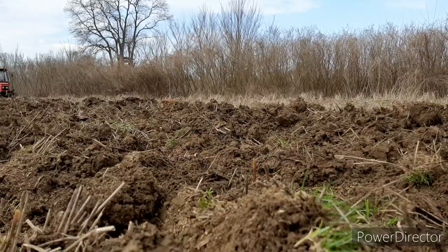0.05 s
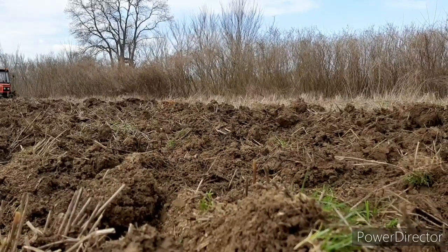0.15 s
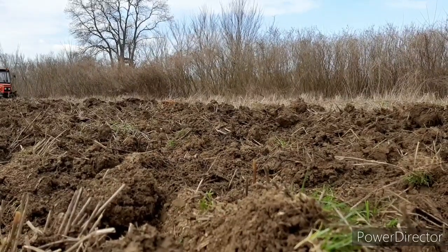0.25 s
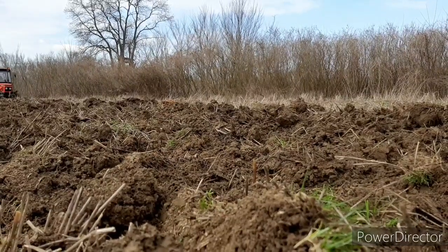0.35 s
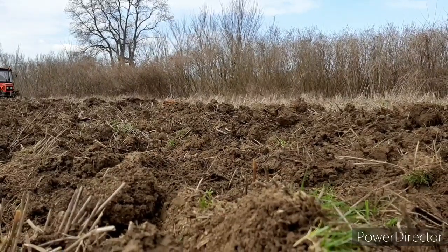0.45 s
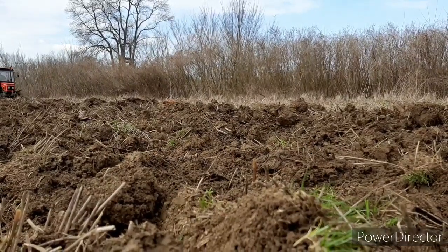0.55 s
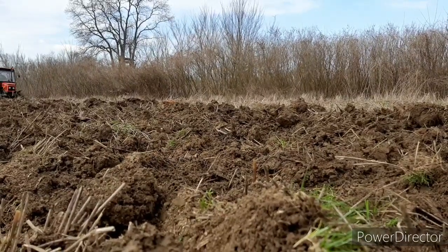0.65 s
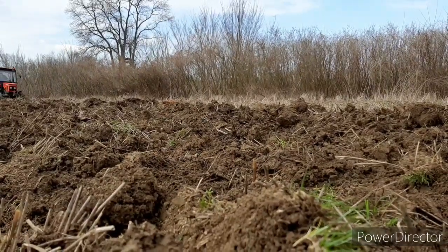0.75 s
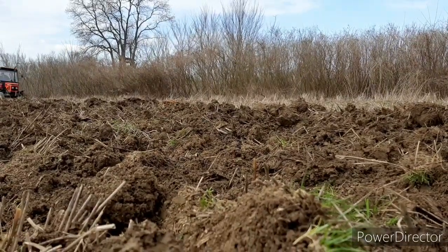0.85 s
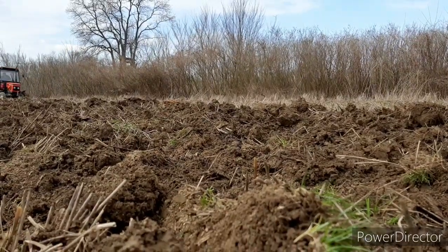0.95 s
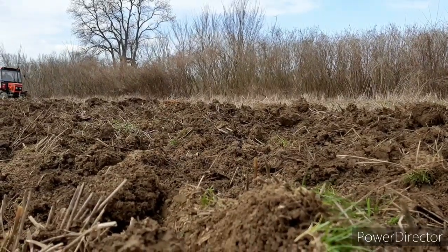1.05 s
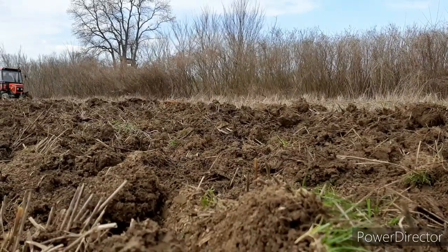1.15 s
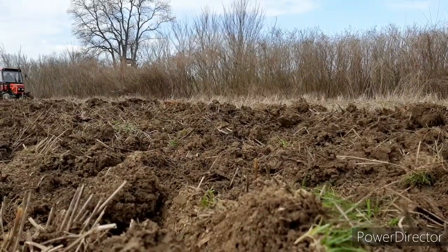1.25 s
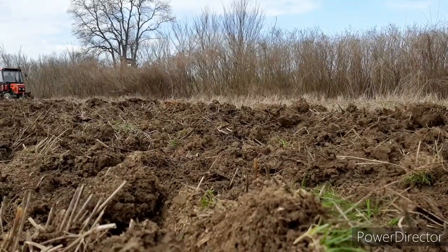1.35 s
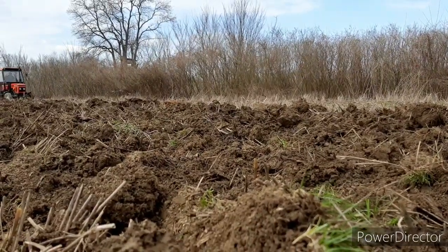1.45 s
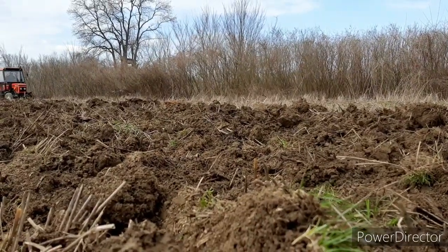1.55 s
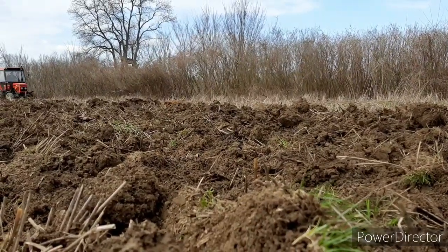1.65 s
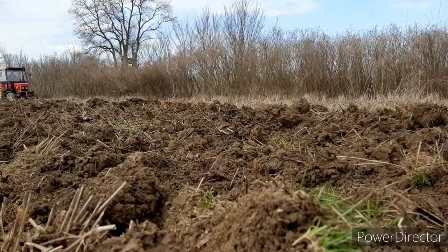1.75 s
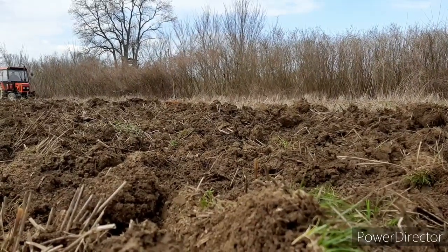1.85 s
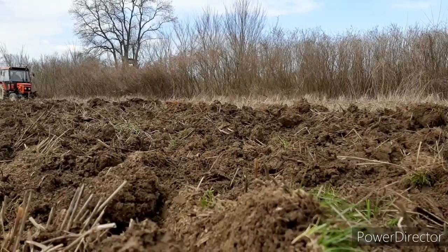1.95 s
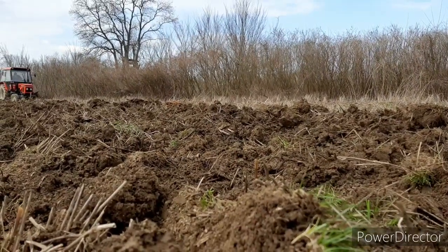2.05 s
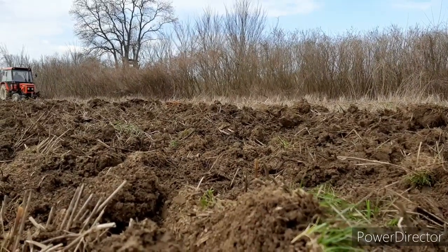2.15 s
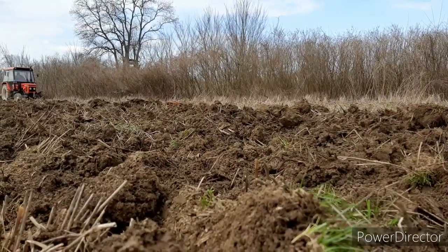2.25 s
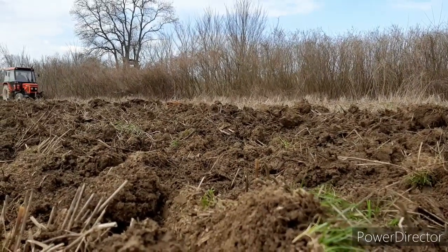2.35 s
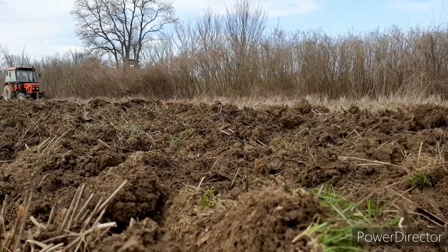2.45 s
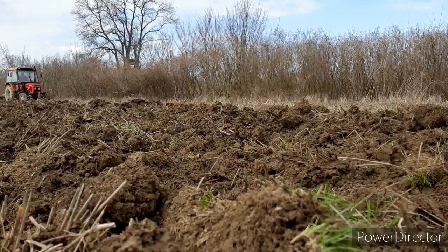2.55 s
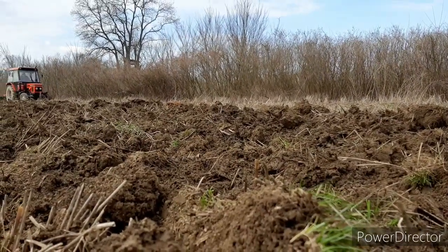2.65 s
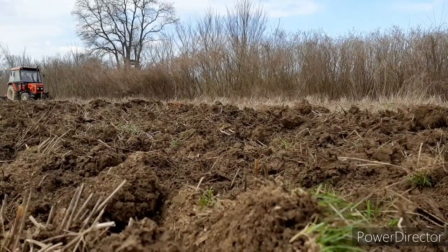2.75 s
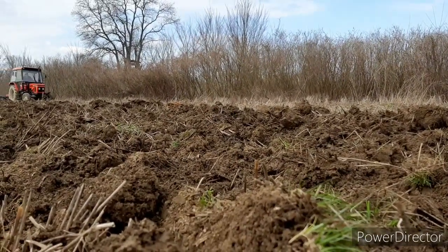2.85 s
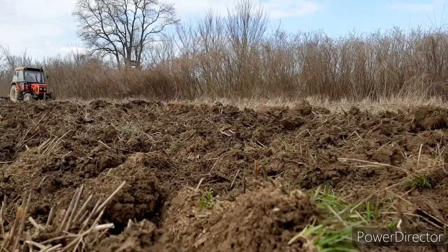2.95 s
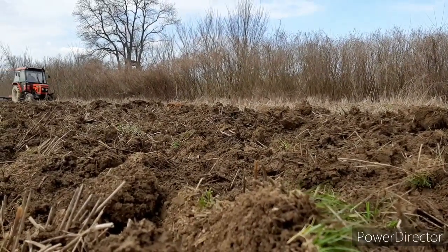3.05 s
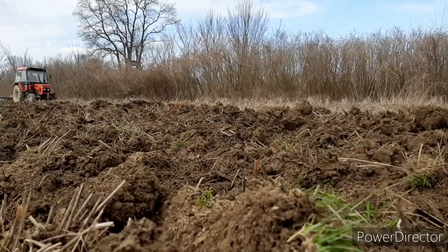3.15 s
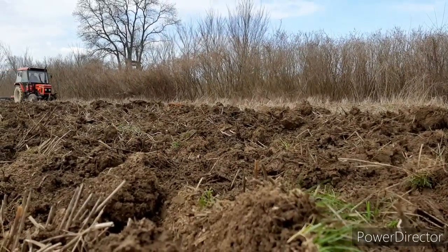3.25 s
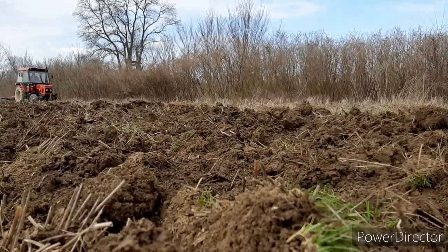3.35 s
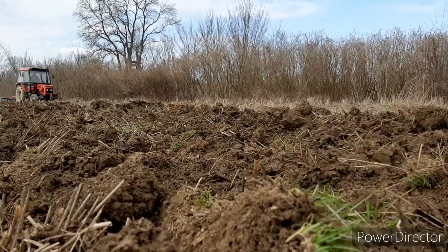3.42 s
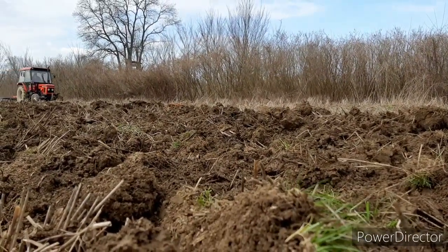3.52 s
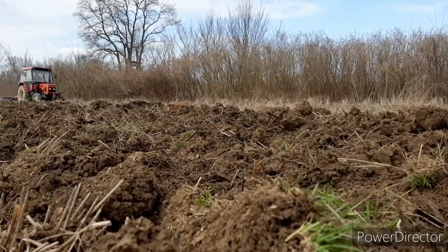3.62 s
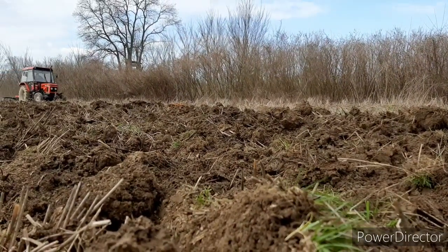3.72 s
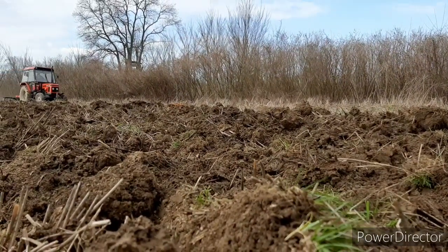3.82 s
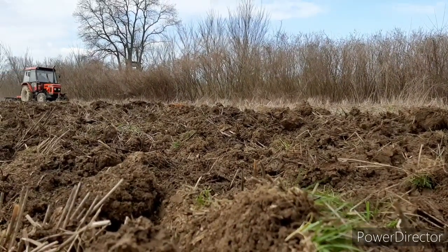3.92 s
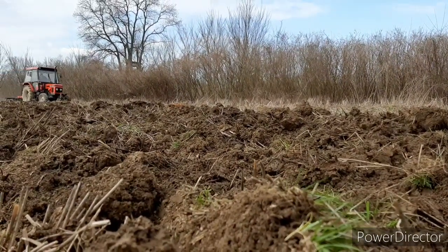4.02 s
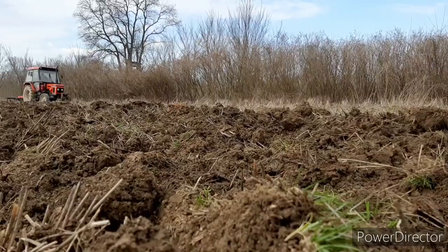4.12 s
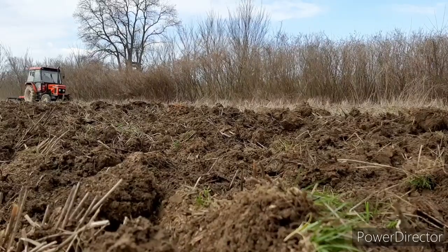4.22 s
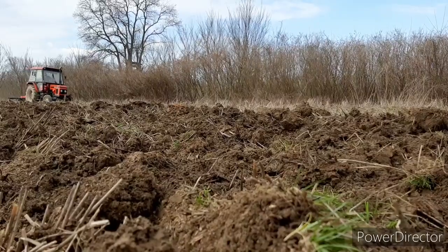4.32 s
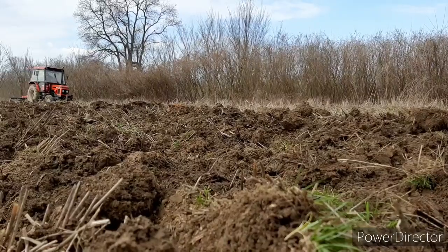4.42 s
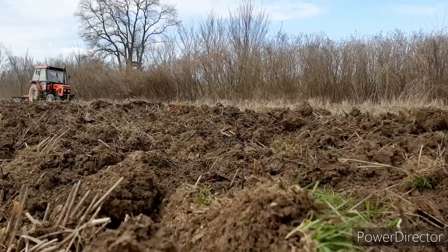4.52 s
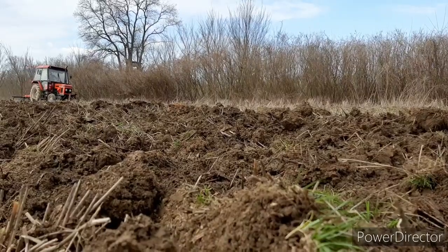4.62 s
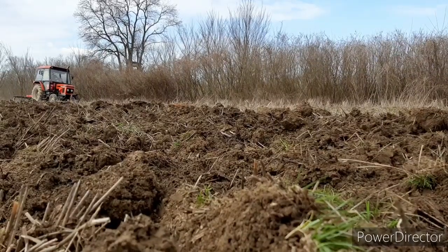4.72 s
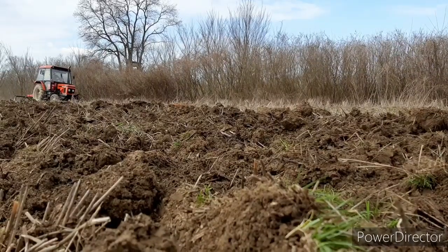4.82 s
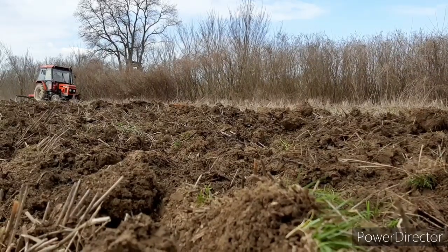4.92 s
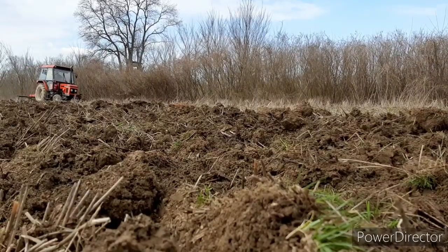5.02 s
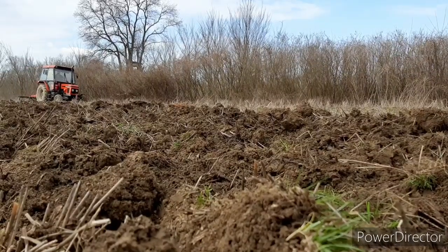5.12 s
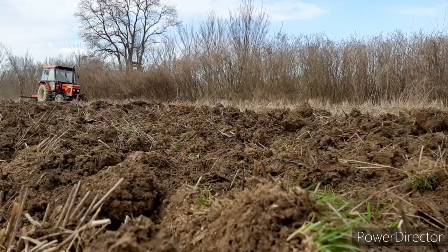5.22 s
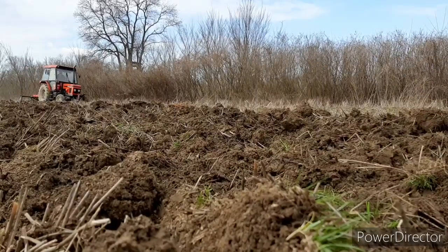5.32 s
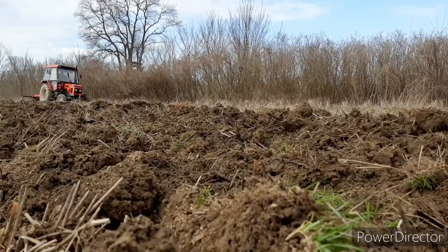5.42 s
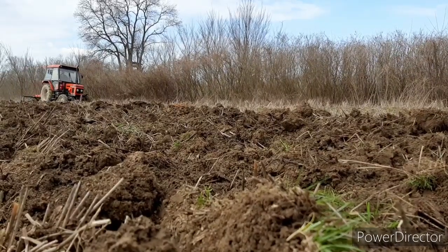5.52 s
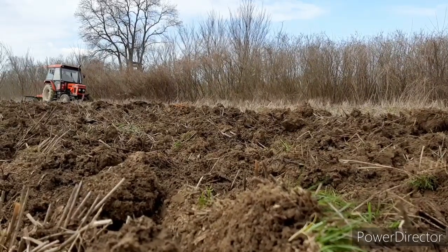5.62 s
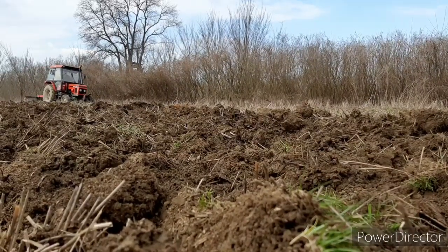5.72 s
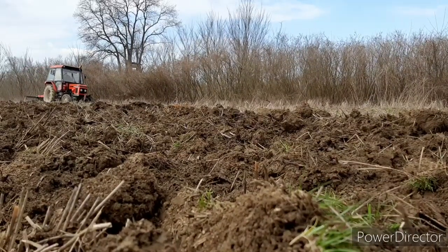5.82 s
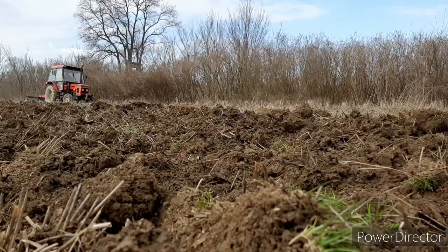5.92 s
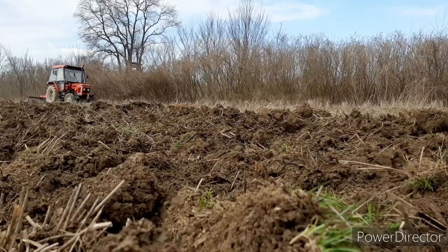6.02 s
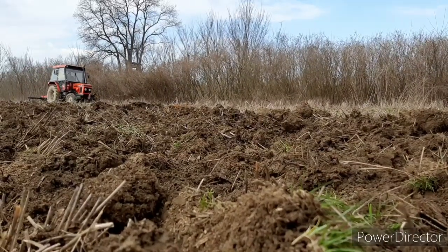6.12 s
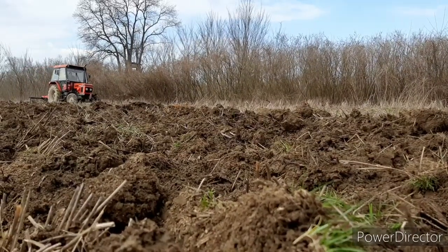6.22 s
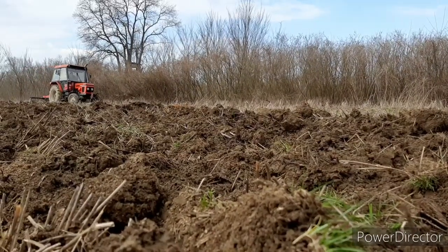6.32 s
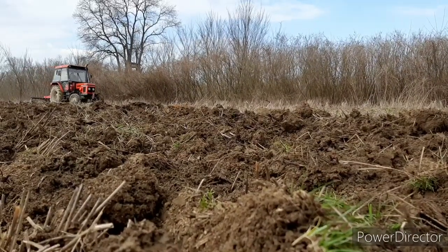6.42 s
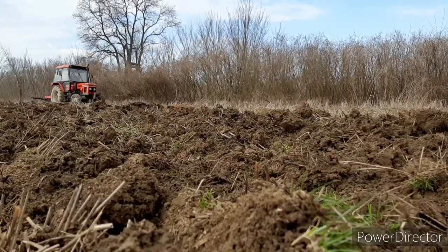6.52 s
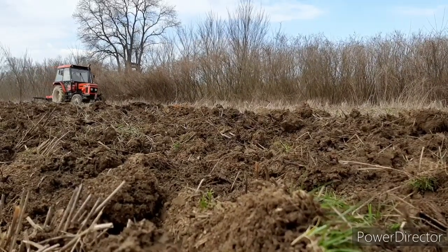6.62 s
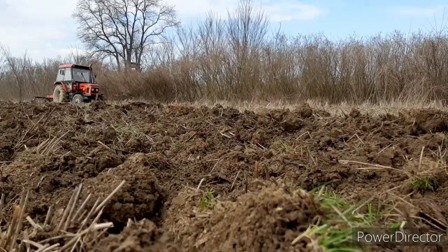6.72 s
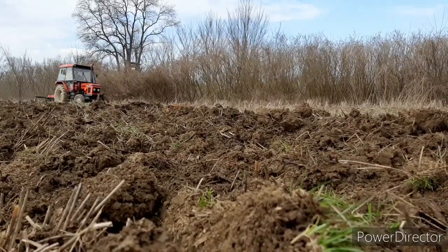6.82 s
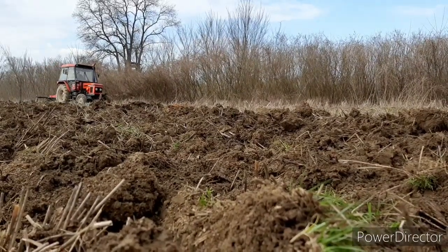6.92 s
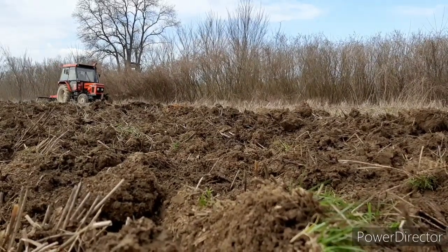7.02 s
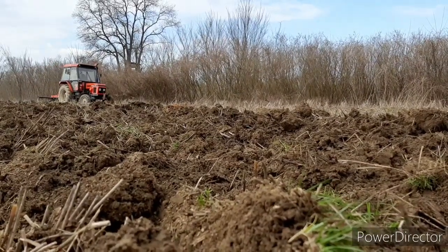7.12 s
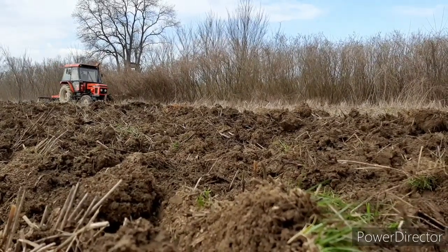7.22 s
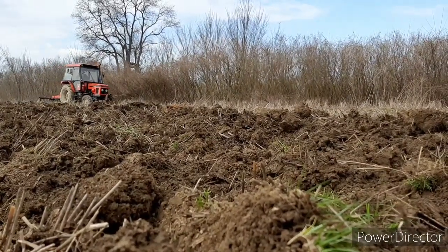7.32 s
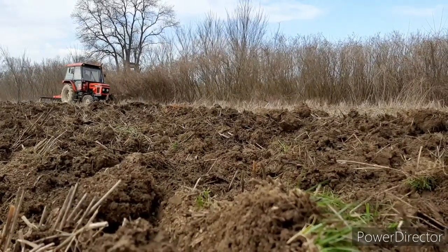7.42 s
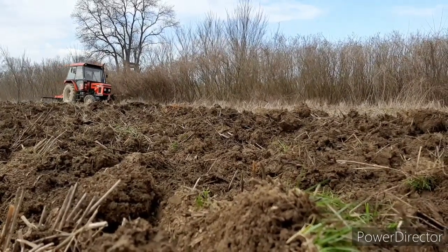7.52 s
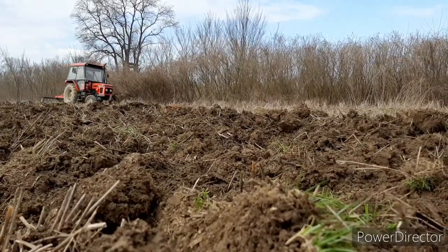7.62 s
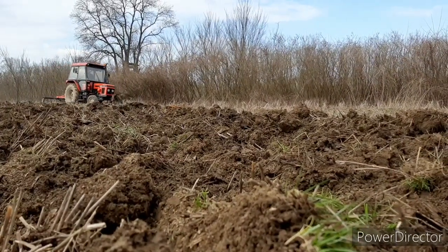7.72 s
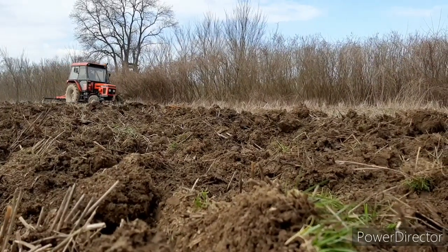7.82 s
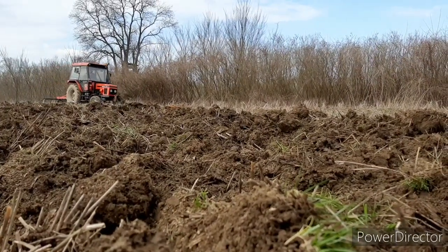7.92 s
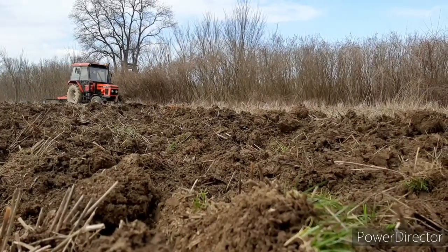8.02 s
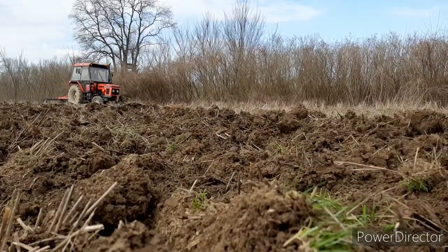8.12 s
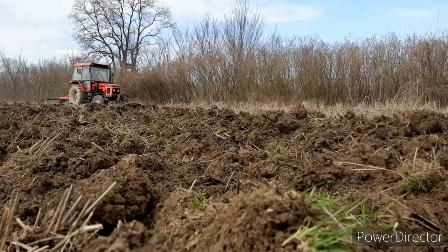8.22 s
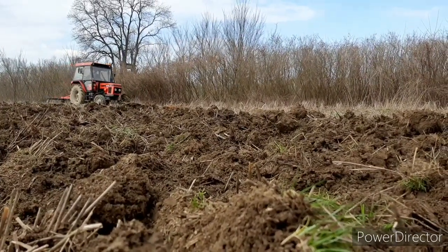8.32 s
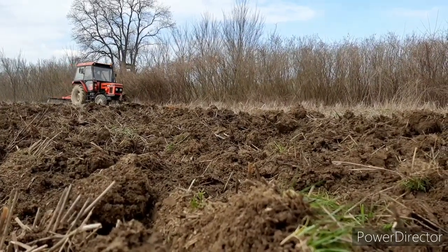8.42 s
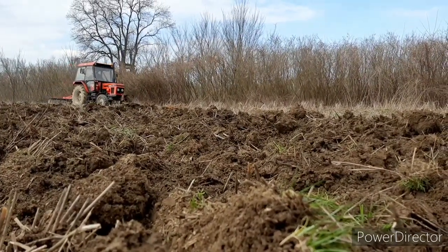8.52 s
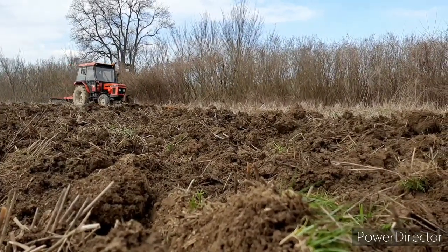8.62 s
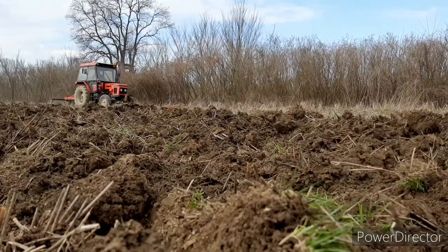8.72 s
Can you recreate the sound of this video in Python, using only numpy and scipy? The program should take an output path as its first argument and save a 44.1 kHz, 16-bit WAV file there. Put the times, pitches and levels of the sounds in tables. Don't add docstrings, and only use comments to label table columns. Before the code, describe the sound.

Continuous low tractor drone with rapid engine clatter, a couple of dry stalk snaps close by, and gritty stone scrapes from the discs later on.

```python
import sys
import numpy as np
from scipy import signal
from scipy.fft import rfft, irfft, next_fast_len
from scipy.io import wavfile

SR = 44100
rng = np.random.default_rng(int(sys.argv[2]) if len(sys.argv) > 2 else 0)


def amplitude_ratio(level_db):
    exponent = np.asarray(level_db, float) / 20
    return 10 ** exponent


def unload_wav(signal):
    wavfile.write(
        sys.argv[1],
        SR,
        np.round(np.clip(np.atleast_2d(signal).T, -1, 1) * 32767).astype(np.int16),
    )


N = 386316

# time in seconds, speed in firings per second.
FIRING_SPEED = [(0.0, 47.03), (0.1, 48.34), (1.12, 47.48), (1.5, 48.86), (2.12, 47.37), (2.53, 49.32),
                (3.02, 47.76), (3.82, 48.61), (4.06, 47.29), (4.57, 47.46), (4.87, 49.78), (5.11, 48.03),
                (6.59, 47.65), (6.8, 46.62), (7.23, 48.48), (7.33, 47.81), (8.2, 48.13), (8.76, 48.52)]
SET_SPEED_HZ = 48.1

# multiple of the four-firing cycle, level in dB against the boom.
UNEVEN_TONES = [(2, -46), (3, -39), (5, -27), (6, -37), (7, -33), (9, -38), (10, -29), (11, -33), (12, -30),
                (13, -37), (15, -39), (16, -40), (17, -33), (18, -39), (22, -41), (24, -32), (28, -39)]
BOOM_DB, APPROACH_DB_PER_S, LOAD_DB_PER_HZ = -24.5, 0.4, 0.56
THROB_DB, THROB_DB_PER_S = -32, 0.03

# delay in ms, decay in ms, steady share from 0 to 1,
# level of the hard blow in dB, then the levels of cylinders one to four in dB.
SUMP = (3.5, 12, .38, -7, -6, -1, 6, -1)
BLOCK = (5, 14, .45, -9, 0, -1, -4, 5)
PANELS = (0.5, 14, 0.5, -7.5, 0.5, 5, 6.5, 4.5)
VALVES = (1.5, 4, 0.82, -27, 1.5, 0.5, 4.5, 5.5)
SOIL = (2, 12, .85, -30, 0, 0, 0, 0)

SOIL_EDGES = [40, 130, 250, 470]
SUMP_EDGES = [470, 600, 760]
BLOCK_EDGES = [760, 900, 1100]
PANEL_EDGES = [1100, 1400, 1750]
HOOD_EDGES = [1750, 2150, 2600]
CLATTER_EDGES = [2600, 3400, 4200, 5200, 6500, 8000]
HISS_EDGES = [8000, 10000, 12500, 16000]

# pitch in Hz, time to fade by 60 dB in seconds, level in dB, the part that hits it.
RINGING_SHEETS = [
    (575, .07, -25, SUMP),
    (935, .06, -21, BLOCK),
    (1546, .15, -28, PANELS),
    (2040, .05, -27, PANELS),
]

# time in seconds, level in dB.
AIR_CARRY = [(0, -1.5), (.7, -3), (1.2, 0), (1.55, 2.5), (1.9, 4), (2.45, 2), (2.75, 0), (3.2, 2.5),
             (3.7, -1), (4.3, -3), (4.8, -2.5), (5.3, -2.5), (5.8, -2.5), (6.6, 0.5), (7.2, 2.5),
             (7.5, 1.5), (8.1, 2.5), (8.76, 1.5)]
BLOCK_AIR, PANEL_AIR, HOOD_AIR, CLATTER_AIR, HISS_AIR, SOIL_AIR = 0.071, 0.27, 0.8, 1.0, 0.65, 0.1
BLOCK_LOAD, PANEL_LOAD, CLATTER_LOAD, HISS_LOAD, SOIL_LOAD = 1, 0.07, 0.1, 0.11, 0.1

SQUEAL_FAR_DB, SQUEAL_NEAR_DB, SQUEAL_FROM_S, SQUEAL_TO_S = -74, -56.5, 5.7, 6.8
SQUEAL_FADE_DB, SQUEAL_FADE_S = -5, 7.5

# start in seconds, peak level in dB, left minus right in dB,
# decay in ms, highest pitch in Hz.
STALK_SNAPS = [
    (.0219, -24, -16, .6, 9000),
    (1.9064, -21, -13, .7, 15000),
]

# start in seconds, level in dB, length in ms,
# lowest pitch in Hz, highest pitch in Hz.
STONE_STRIKES = [(2.43, -31.5, 31, 3500, 7500), (2.955, -49, 8, 3000, 14000), (3.24, -56, 20, 4000, 14000),
                 (4.92, -62, 12, 13000, 16000), (4.955, -55, 8, 9000, 13000), (5.206, -47, 23, 5030, 16000),
                 (5.88, -55, 12, 8000, 15000), (6.286, -39, 25, 3000, 15000), (6.725, -58, 31, 9000, 15000),
                 (6.875, -53, 15, 8000, 15000), (7.217, -28, 34, 2550, 9500),
                 (7.255, -46, 6.1, 8000, 15000), (7.32, -46, 8.1, 4000, 15000),
                 (7.652, -28, 12, 3000, 9000), (7.692, -48, 10, 7000, 15000), (7.899, -42, 11, 4000, 15000),
                 (7.941, -43, 6, 3000, 9000), (8.05, -51, 7, 8000, 15000), (8.132, -40.5, 14, 4500, 15000),
                 (8.397, -46, 10, 4000, 15000)]

# pitch in Hz, lag in radians.
LEFT_PORT_LAG = [(129, 0.59), (1248, 0.02), (2239, 7.47), (2583, 12.8), (3273, 8.14), (4134, 13.5),
                 (4737, 13.3), (4909, 9.6), (5684, 14.1), (5727, 14.5), (6675, 5.2), (6933, 8.5),
                 (7105, 7.5), (7967, 11.38)]
# pitch in Hz, shared share from 0 to 1.
PORT_LIKENESS = [(150, 1), (1000, .93), (2300, .84), (4000, .74), (8000, .7), (12500, .69), (15500, .55)]

# pitch in Hz, level in dB per Hz.
LEFT_FAR_COLOUR = [
    [(45, -24), (80, 4), (135, -16.5)],
    [(215, -2), (301, -4.5), (430, -19.5), (559, -4), (689, -8.5), (947, -9.5), (1033, -14.5), (1507, -2), (1722, -13), (2024, 3), (2325, -10.5), (2540, -9), (2670, -19)],
    [(2756, -15), (3100, -24), (3359, -3), (4134, -27), (4478, -9), (4823, -15), (5340, -10.5), (5598, -33), (5943, -12), (6890, -16), (7235, -23), (8354, -34), (8527, -36)],
    [(8613, -35), (8957, -31), (10335, -18.5), (11025, -27), (11714, -19), (13500, -30), (14470, -20.5), (15331, -25)],
]
RIGHT_FAR_COLOUR = [
    [(45, 3), (80, 12.7), (135, 11)],
    [(215, -6), (301, 0.5), (473, -16), (559, 1), (775, -0.9), (947, 6.5), (1076, -7.5), (1550, 2), (1636, -2.5), (2024, 0), (2239, 0.5), (2368, -6.5), (2670, -11)],
    [(2756, -6), (3014, -2.5), (3531, -5), (3703, -8.5), (3962, -12), (4392, 1.2), (4823, -6.5), (5512, -11), (5857, -5), (6718, -19.5), (7235, -11), (8010, -16), (8527, -22)],
    [(8613, -27), (8957, -15.5), (9646, -31), (10100, -14.5), (11000, -42), (12200, -17.5), (13500, -29), (14500, -23), (15331, -20)],
]
# pitch in Hz, level in dB per Hz.
LEFT_NEAR_COLOUR = [
    [(45, -15), (80, 1), (135, -1.5)],
    [(215, -2), (344, -4.5), (430, -14.5), (732, -4), (947, -4), (1033, -22), (1248, 2.5), (1550, -8), (1722, -4), (2067, 2.5), (2325, -3), (2497, -12), (2670, 0)],
    [(2756, -15), (3100, -40), (3531, -2.5), (3962, -21), (4478, -9), (4823, -10), (5340, -17), (5770, -19.5), (7321, -11.5), (7665, -20), (7838, -18), (8182, -22), (8527, -28)],
    [(8613, -22), (8957, -22), (10300, -19), (11886, -17), (12747, -17), (14298, -16), (15331, -23)],
]
RIGHT_NEAR_COLOUR = [
    [(45, 2), (80, 8.4), (135, 15.4)],
    [(215, -5), (344, 0.5), (473, -4.5), (516, -24), (602, 1), (861, 2.5), (947, 7.5), (1076, -3.5), (1464, 6), (1550, 1.5), (1722, -2.5), (2497, -0.8), (2670, -36)],
    [(2756, -1), (3100, -0.2), (3875, -8.5), (4306, 1), (4737, -13), (5512, -2.7), (5857, -6.5), (6201, -1.2), (6546, -10), (7407, -8), (7665, -8), (7924, -18.5), (8527, -15)],
    [(8613, -24.5), (9474, -10), (10400, -20.5), (12100, -13.5), (12919, -15), (14125, -16), (15331, -22)],
]
NEARER_FROM_S, NEARER_TO_S = 2.3, 7.47
TREBLE_HZ, TREBLE_FROM_S, TREBLE_TO_S = 8550, 4.9, 7

OPENING_DB, OPENING_FROM_S, OPENING_TO_S = -4, 0.25, 0.66
TOP_HZ = 15300


def rms_one(x):
    return x / np.sqrt(np.mean(x ** 2) + 1e-20)


def in_time(rows):
    s, *columns = np.transpose(rows)
    return [np.interp(np.arange(N) / SR, s, column) for column in columns]


def at_hz(points, hz):
    points = np.array(sorted(points))
    return np.interp(np.log(hz), np.log(points[:, 0]), points[:, 1])


def ramp(from_s, to_s):
    return np.clip((np.arange(N) / SR - from_s) / (to_s - from_s), 0, 1)


def drift(rate):
    r = np.exp(-80 * np.pi * rate / SR)
    noise = rng.standard_normal(N // 40 + 2002)
    slow = signal.lfilter([1], [1, -2 * r, r * r], noise)[2000:]
    return np.interp(np.arange(N) / 40, np.arange(len(slow)), rms_one(slow - slow.mean()))


def band(x, low_hz, high_hz):
    sos = signal.butter(2, [low_hz, min(high_hz, 0.45 * SR)], "band", fs=SR, output="sos")
    return signal.sosfilt(sos, x)


def exhaust(firings, boom_db, throb_db):
    cycle = 2 * np.pi * firings / 4
    early = 0.11 * np.sin(2 * cycle + 3.0) + 0.07 * np.cos(cycle - 4.0)
    strong = 1 + 0.1 * np.cos(cycle - 0.2)
    out = amplitude_ratio(boom_db) * strong * np.cos(8 * cycle + early)
    out += amplitude_ratio(throb_db) * np.cos(4 * cycle - 1.0)
    for multiple, level_db in UNEVEN_TONES:
        wander = rng.uniform(0, 2 * np.pi) + 0.3 * drift(1.4)
        level = amplitude_ratio(boom_db + level_db + 0.64 * drift(2.1))
        out += level * np.cos(multiple * cycle + wander)
    return np.sqrt(2) * out


def shaking(firings, per_s, part, uneven_db):
    delay_ms, decay_ms, steady, blow_db, *cylinder_db = part
    late = firings - delay_ms / 1000 * per_s + 4
    index = late.astype(int)
    since_ms = 1000 * (late - index) / per_s
    chance_db = uneven_db * rng.standard_normal(500)[index]
    size = amplitude_ratio(np.array(cylinder_db)[index % 4] + chance_db)
    burst = size * np.exp(-since_ms / decay_ms) * np.minimum(since_ms / 3.2, 1)
    envelope = rms_one(steady + (1 - steady) * rms_one(burst))
    new_firing = np.diff(index, prepend=index[0]) > 0
    blows = amplitude_ratio(blow_db) * rms_one(size * new_firing)
    return envelope, blows


def knock(firings, per_s):
    air_db = in_time(AIR_CARRY)[0]
    load = SET_SPEED_HZ - per_s
    parts = [(SUMP_EDGES, SUMP, BLOCK_AIR, BLOCK_LOAD),
             (BLOCK_EDGES, BLOCK, BLOCK_AIR, BLOCK_LOAD),
             (PANEL_EDGES, PANELS, PANEL_AIR, PANEL_LOAD),
             (HOOD_EDGES, VALVES, HOOD_AIR, PANEL_LOAD),
             (CLATTER_EDGES, VALVES, CLATTER_AIR, CLATTER_LOAD),
             (HISS_EDGES, VALVES, HISS_AIR, HISS_LOAD),
             (SOIL_EDGES, SOIL, SOIL_AIR, SOIL_LOAD)]
    white = rng.standard_normal((2, 3, N))
    gust = drift(16.2)
    out = np.zeros((3, N))
    dealt = 0
    for edges, part, air_share, load_db in parts:
        shake, blows = shaking(firings, per_s, part, uneven_db=1.3)
        for low_hz, high_hz in zip(edges, edges[1:]):
            patchy_db = 0.7 * drift(1.0) + 1.0 * drift(16) + 0.7 * gust
            air = amplitude_ratio(air_share * air_db + load_db * load + patchy_db)
            source = white[dealt % 2] * shake + blows * [[1], [0], [0]]
            out += band(source, low_hz, high_hz) * air
            dealt += 1
    return out


def ringing(firings, per_s):
    out = np.zeros((3, N))
    level_db = BLOCK_LOAD * (SET_SPEED_HZ - per_s) + 1.8 * drift(0.78)
    for hz, t60, ring_db, part in RINGING_SHEETS:
        blows = shaking(firings, per_s, part, uneven_db=2.5)[1] * amplitude_ratio(level_db)
        r = amplitude_ratio(-60 / (t60 * SR))
        w = 2 * np.pi * hz / SR
        ring = signal.lfilter([0, 1], [1, -2 * r * np.cos(w), r * r], blows + 1e-18)
        out[0] += amplitude_ratio(ring_db) * rms_one(ring)
    return out


def bearing(firings, per_s):
    growth_db = (SQUEAL_NEAR_DB - SQUEAL_FAR_DB) * ramp(SQUEAL_FROM_S, SQUEAL_TO_S)
    fade_db = SQUEAL_FADE_DB * ramp(SQUEAL_TO_S, SQUEAL_FADE_S)
    level_db = SQUEAL_FAR_DB + growth_db + fade_db
    whistle = rms_one(band(rng.standard_normal(N), 12330, 12520))
    shake = shaking(firings, per_s, VALVES, uneven_db=7.0)[0]
    return amplitude_ratio(level_db + 2.3 * drift(7.7)) * whistle * shake


def ticks():
    out = np.zeros((2, N))
    t_ms = np.arange(300) / SR * 1000
    for s, level_db, pan_db, decay_ms, high_hz in STALK_SNAPS:
        crackle = 0.55 * rng.choice([-1, 1], 300) + 2.5 * (t_ms == 0)
        snap = band(crackle * np.exp(-t_ms / decay_ms), 1500, high_hz)
        at = round(s * SR)
        out[:, at:at + 300] += amplitude_ratio(level_db + np.array([[0.5], [-0.5]]) * pan_db) * snap
    return out


def stones():
    out = np.zeros((3, N))
    for s, level_db, length_ms, low_hz, high_hz in STONE_STRIKES:
        at = round(s * SR)
        t = np.arange(3000) / SR * 1000 / length_ms
        clicks = rng.standard_normal((3, 3000)) * amplitude_ratio(1.5 * rng.standard_normal(3000))
        grit = rms_one(band(clicks, low_hz, high_hz))
        bright_db = 31.7 + 11.8 * np.log2(high_hz * low_hz / 23600000.0)
        swell = np.minimum(2.1 * t, 1) * np.exp(-t ** 2)
        out[:, at:at + 3000] += amplitude_ratio(level_db + bright_db) * grit * swell
    return out


def ports(rows, level_db):
    size = next_fast_len(N + 4096)
    hz = np.maximum(np.arange(size // 2 + 1) * SR / size, 1)
    shared, left_own, right_own = rfft(rows, size)
    alike = np.clip(at_hz(PORT_LIKENESS, hz), 0, 1)
    lag = np.exp(-1j * at_hz(LEFT_PORT_LAG, hz))
    left = np.sqrt(alike) * shared * lag + np.sqrt(1 - alike) * left_own
    right = np.sqrt(alike) * shared + np.sqrt(1 - alike) * right_own
    tables = (LEFT_FAR_COLOUR, RIGHT_FAR_COLOUR, LEFT_NEAR_COLOUR, RIGHT_NEAR_COLOUR)
    colours = amplitude_ratio([at_hz(sum(ranges, []), hz) for ranges in tables])
    change = colours[2:] - colours[:2]
    top = 1 / (1 + (TREBLE_HZ / hz) ** 12)
    filters = np.array([colours[:2], change * (1 - top), change * top])
    far, low, high = irfft(filters * [left, right], size)[..., :N]
    nearness = ramp(NEARER_FROM_S, NEARER_TO_S)
    return amplitude_ratio(level_db) * (far + nearness * low + ramp(TREBLE_FROM_S, TREBLE_TO_S) * high)


def scene():
    per_s = in_time(FIRING_SPEED)[0]
    s = np.arange(N) / SR
    firings = np.cumsum(per_s) / SR - 0.164
    load_db = LOAD_DB_PER_HZ * (SET_SPEED_HZ - per_s)
    boom_db = BOOM_DB + APPROACH_DB_PER_S * s + load_db + 0.37 * drift(2.1)
    throb_db = THROB_DB + THROB_DB_PER_S * s + 0.74 * drift(3.0)
    boom = exhaust(firings, boom_db, throb_db) * amplitude_ratio([[-2.5], [2.0]])
    through_clods = knock(firings, per_s) + ringing(firings, per_s) + stones()
    far = boom + ports(through_clods, level_db=-27.0) + bearing(firings, per_s)
    opening = amplitude_ratio(OPENING_DB * (1 - ramp(OPENING_FROM_S, OPENING_TO_S)))
    return far * opening + ticks()


def low_pass(x):
    return signal.sosfilt(signal.butter(12, 15980, fs=SR, output="sos"), x)


def record(dry):
    steep = signal.ellip(10, 0.5, 60, TOP_HZ, fs=SR, output="sos")
    mix = signal.sosfilt(steep, dry)
    return low_pass(mix)


dry = scene()
out = record(dry)
unload_wav(out)
```